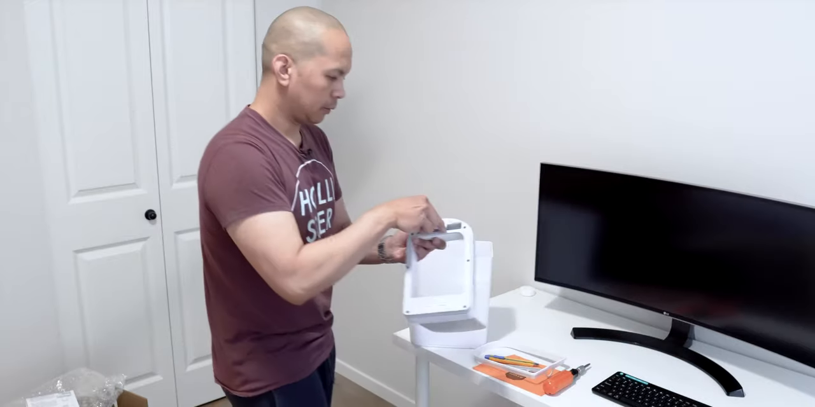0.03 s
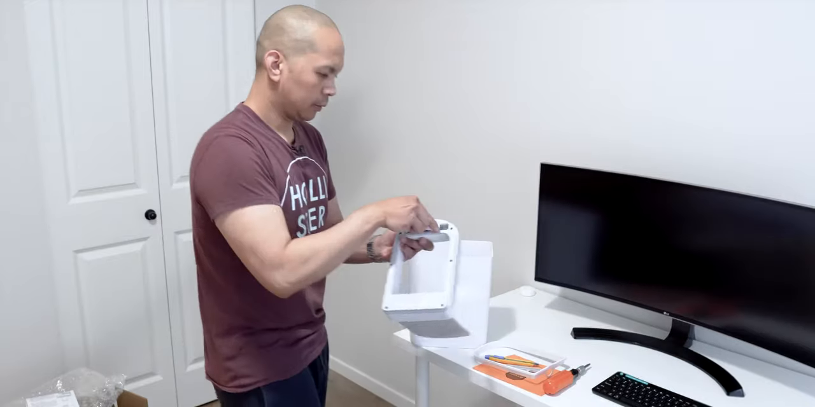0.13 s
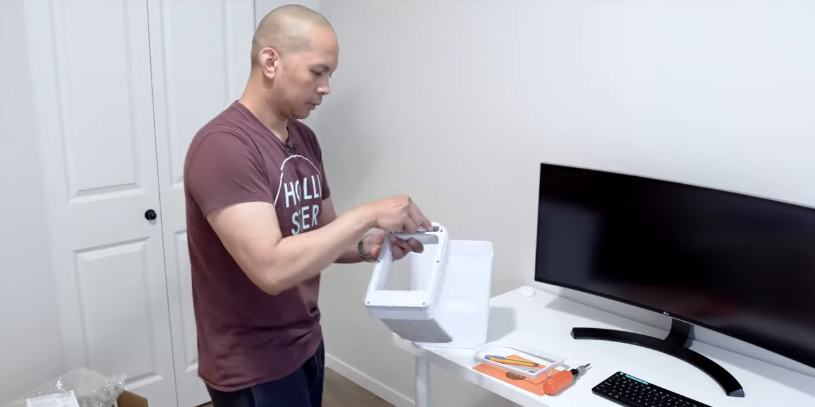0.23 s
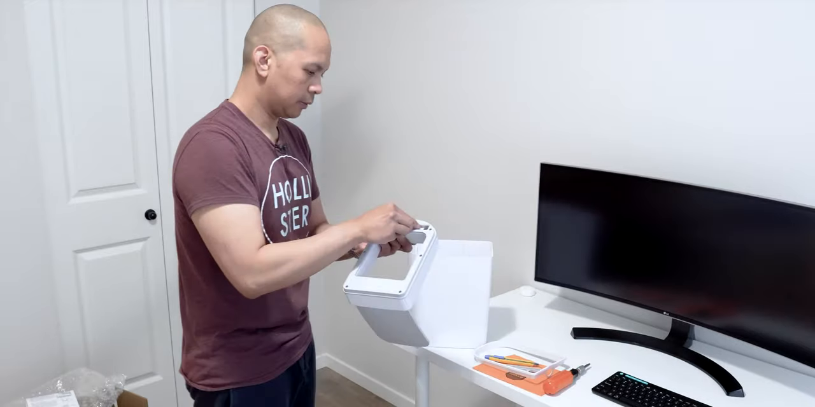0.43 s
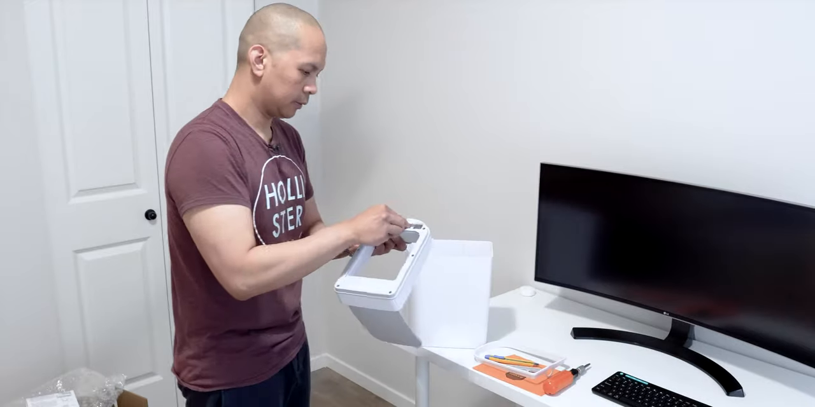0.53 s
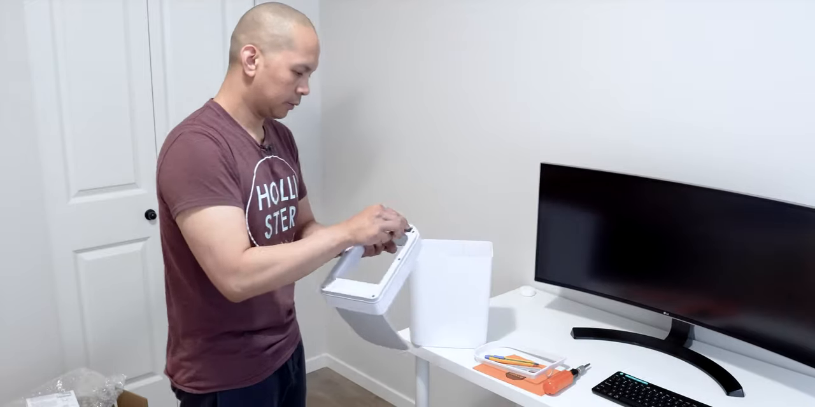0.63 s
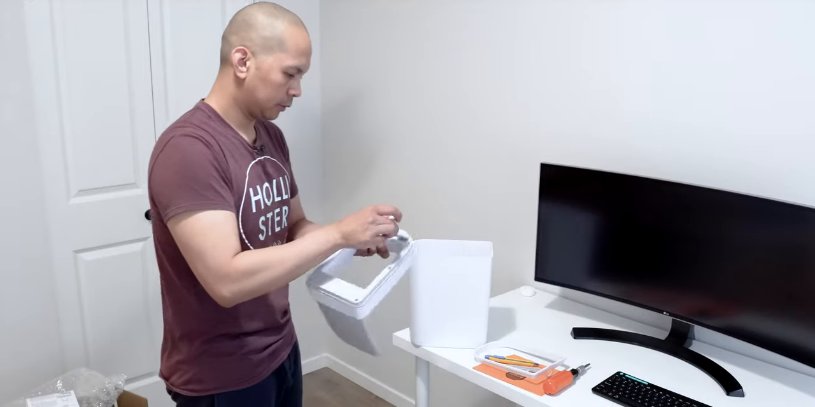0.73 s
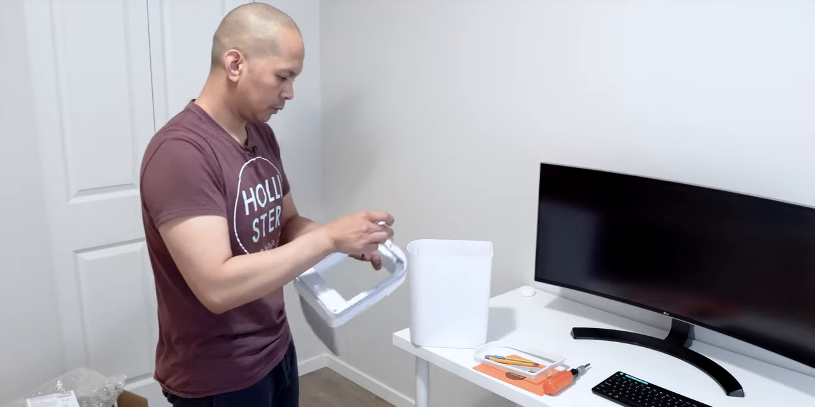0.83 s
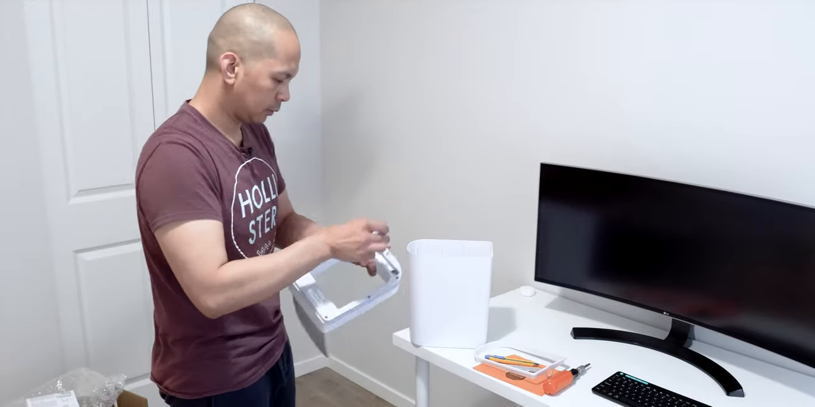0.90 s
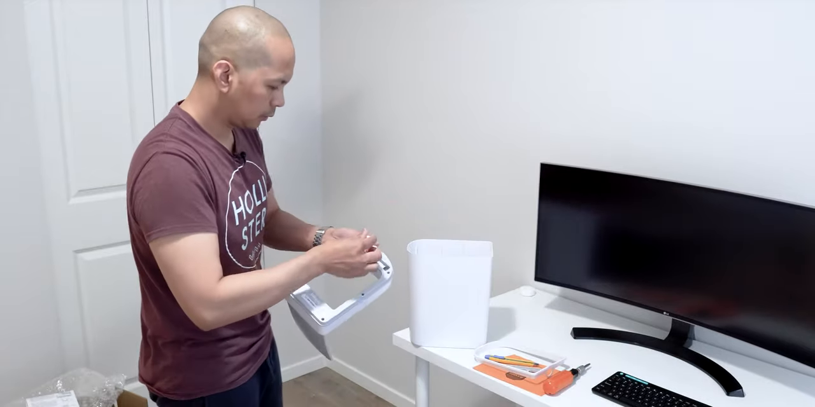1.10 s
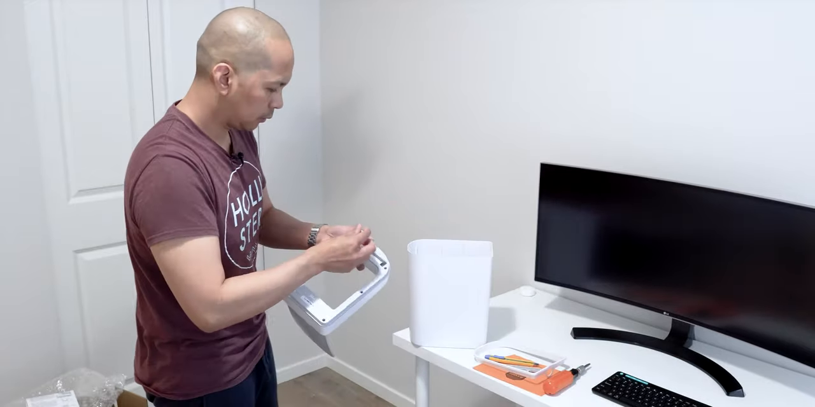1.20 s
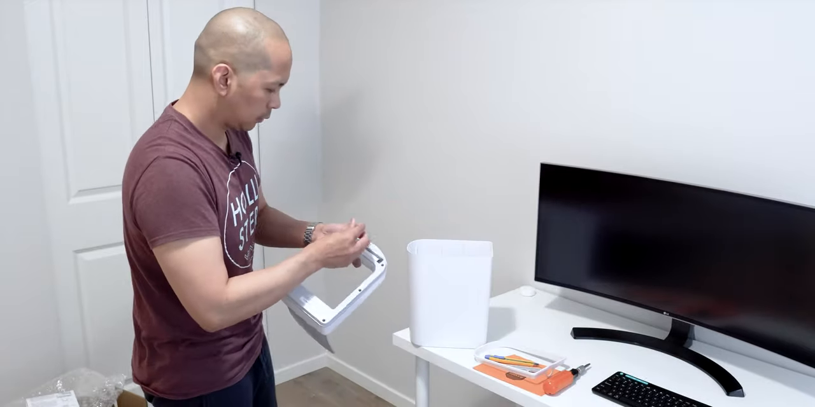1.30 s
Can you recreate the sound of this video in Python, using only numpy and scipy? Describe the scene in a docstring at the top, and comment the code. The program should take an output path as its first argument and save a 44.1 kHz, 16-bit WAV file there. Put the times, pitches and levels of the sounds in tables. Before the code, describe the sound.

A hollow plastic lid is handled, scraping and knocking in a short clatter. Then batteries click lightly against their metal contacts. The microphone is fairly near, in a bare, echoing room with a low motor hum.

```python
"""Plastic lid and batteries, indoors

A bare, echoing room on one microphone, near enough for the direct sound to lead the echo.
Hands work a hollow plastic lid: blows ring its shell, tiny slips make it creak and scrape, and
fingers hiss over it. Batteries click on their metal contacts. A low motor hum lies underneath."""
import sys
import numpy as np
from scipy import signal
from scipy.io import wavfile
from scipy.ndimage import uniform_filter1d

SR = 44100
rng = np.random.default_rng(int(sys.argv[2]) if len(sys.argv) > 2 else 0)


def generate_wav(sig):
    """Save sig (samples, or channels by samples) to the path in sys.argv[1] as 16-bit PCM at SR."""
    pcm = np.round(np.clip(np.atleast_2d(sig).T, -1, 1) * 32767).astype(np.int16)
    wavfile.write(sys.argv[1], SR, pcm)


N = 59535

# motor hum: (time [s], pitch [Hz], level [dB])
MOTOR_HUM = [(0.0, 62, -40.5), (0.082, 54, -35), (0.108, 60.3, -41), (0.308, 59, -36.5), (0.5, 60, -35),
             (0.522, 59.3, -45), (0.698, 59.07, -38.5), (0.97, 58.7, -34.5), (1.0, 58.8, -38),
             (1.248, 57.1, -36), (1.274, 56.9, -41), (1.35, 58.9, -38.5)]
# handling rumble: (time [s], level [dB])
HANDLING_RUMBLE = [(0.0, -64.5), (0.074, -47), (0.112, -58), (0.432, -68), (0.484, -65), (0.514, -44.5),
                   (0.566, -53.5), (0.642, -71), (0.842, -83), (0.886, -59), (0.91, -67.5), (1.258, -70.5),
                   (1.33, -59.5), (1.35, -50.5)]
# decay of the bare room: (octave centre [Hz], T60 [s])
ROOM_DECAY = [(250, 0.19), (500, 0.23), (1000, 0.51), (2000, 1), (4000, 0.83), (8000, 0.49), (14000, 0.1)]
# skin sliding on smooth plastic: (time [s], level [dB] in each of the three slide bands)
FINGER_SLIDE = [(0.0, -59, -49, -69), (0.04, -47.5, -43, -46), (0.124, -41.5, -43.5, -50),
                (0.172, -55, -50.5, -57), (0.18, -38, -62, -56), (0.194, -51, -62, -67),
                (0.266, -59.5, -70, -73), (0.424, -67, -56, -66), (0.492, -53.5, -54.5, -56),
                (0.522, -38, -39, -48), (0.526, -52, -51, -55), (0.566, -39.5, -40.5, -54),
                (0.664, -46.5, -46.5, -69), (0.752, -59, -57, -68), (0.826, -76, -88, -107),
                (0.868, -83, -97, -102), (0.928, -80, -84, -84), (0.97, -41.5, -55, -42),
                (1.056, -47.5, -59, -57), (1.078, -48.5, -67, -50), (1.154, -57.5, -74, -71),
                (1.164, -55, -61, -55), (1.214, -59, -68, -69), (1.35, -62, -70, -71)]
# modes of battery and contact: (frequency [Hz], gain [dB], T60 [s])
CONTACT_MODES = [(3350, 1, 0.0091), (3905, 10, 0.068), (4090, 7, 0.046), (4730, 3, 0.012),
                 (6740, -4.5, 0.0093), (7670, 2, 0.018), (8220, -7.5, .015), (12000, -8, 0.0097),
                 (13200, 8.5, 0.0099), (14700, 2, .02)]
# battery clicks: (time [s], strength [dB] in each of four regions of modes, low to high)
BATTERY_CLICKS = [(.4118, -58, -70, -70, -50), (.4630, -55, -65, -49, -50), (0.963, -40, -48, -36, -41),
                  (0.9697, -40, -56, -31.5, -40), (.9790, -53, -54, -59, -45), (.9860, -50, -52, -32, -41),
                  (1.0730, -35, -41, -28.5, -54), (1.163, -34, -42, -36, -48),
                  (1.2320, -37.5, -52, -48, -58.5), (1.283, -47, -50.5, -58, -63)]
# modes of the lid's shell: (frequency [Hz], gain [dB], T60 [s])
SHELL_MODES = [(342, -16, 0.12), (479.5, 1.5, 0.042), (629.6, 1.5, 0.023), (831, 1.5, 0.051),
               (1004, 4.5, 0.014), (1265, -0.5, 0.042), (1575, 5.5, 0.01), (2210, 1, 0.0095),
               (2472, 3, 0.014), (2854, 8, 0.008), (3487, 7, 0.0068), (4216, 7, 0.005), (5160, 4, 0.0038),
               (6030, 4, 0.0062), (7340, 0, 0.0073), (10500, 3, 0.0028), (13000, -4, 0.0037)]
# scraping: (time [s], level [dB] in each of the six shell regions)
SHELL_SCRAPE = [(0, -63, -56, -60.5, -74, -66, -51), (0.05, -62, -70, -62, -68, -61, -46.5),
                (0.108, -57, -62.5, -59, -64.5, -58.5, -55), (0.124, -51.5, -37, -63, -64, -54, -56),
                (0.172, -45, -58, -47.5, -68, -67, -54), (0.19, -26.5, -47, -33, -40, -42, -58),
                (0.24, -41.5, -40, -38, -63, -51, -60), (0.3, -53.5, -46.5, -43, -43, -61, -79),
                (0.33, -52, -48, -45, -51, -52, -59), (0.38, -50, -56, -50, -52, -76, -70),
                (0.44, -48, -65, -38, -58, -75, -84), (0.465, -40, -46, -55, -54, -56, -72),
                (0.49, -46, -56, -48, -38, -48, -62), (0.512, -29, -46, -37, -49, -51, -71),
                (0.524, -43, -19, -38, -51, -41, -57), (0.55, -31.5, -38.5, -23, -40, -49, -66),
                (0.62, -43.5, -34.5, -35, -40.5, -46, -44.5), (0.72, -44.5, -37.5, -36.5, -40.5, -45, -48),
                (0.82, -73.5, -41.5, -40.5, -54.5, -51.5, -61.5), (0.93, -89, -58, -43, -57, -62, -71),
                (0.96, -68, -54, -49, -55.5, -44, -52), (0.985, -59, -53, -49, -48.5, -53, -50),
                (1.03, -56.5, -53.5, -39.5, -53, -53.5, -61), (1.11, -53.5, -64, -47, -58.5, -57, -61),
                (1.2, -81, -84, -61, -63.5, -60.5, -87), (1.27, -90, -79, -65, -69, -66.5, -93),
                (1.35, -80.5, -69, -75.5, -78.5, -73, -80)]
# knocks: (time [s], strength [dB] in each of the six shell regions)
SHELL_KNOCKS = [(0.116, -41, -24, -32, -20, -67, -37), (0.179, -52, -45, -35, -33, -26, -36.5),
                (0.1808, -20.5, -28, -20, -20, -22.5, -28), (0.347, -29, -37.5, -28.5, -23.5, -29, -45),
                (0.4138, -29, -52, -30, -26, -43, -66), (0.4529, -19.5, -54, -32, -26.5, -38, -62),
                (0.5014, -16.5, -37.5, -33, -24, -26, -32), (0.5139, -42, -41, -49, -31, -22, -46),
                (0.5194, -25, -18.5, -14.5, -16.5, -12, -24), (0.534, -57, -9, -19.5, -39, -49, -38),
                (0.5394, -43, -19.5, -22, -25, -46, -25), (0.5606, -24.5, -22, -15.5, -21, -14, -21.5),
                (0.5746, -24, -21, -27, -15.5, -46, -40.5), (0.5803, -42, -31, -21.5, -28, -13.5, -30.5),
                (0.5958, -40, -32, -21.5, -39, -29, -29), (0.6095, -42, -22.5, -13, -38, -30.5, -40),
                (0.6602, -39, -18.5, -15.5, -19, -42, -74), (0.9698, -56, -32, -15, -44, -28, -36),
                (0.9954, -41, -26.5, -35.5, -55, -47, -48)]
# noise suppressor: (frequency [Hz], threshold per bin [dB])
GATE_THRESHOLDS = [(280, -61), (450, -64.5), (800, -66), (1200, -58.5), (3000, -88), (6000, -89),
                   (8000, -75), (11000, -83), (15000, -88)]

SHELL_REGIONS_HZ = (420, 760, 1350, 2650, 4400, 7000)   # centres
CONTACT_SPLITS_HZ, SLIDE_EDGES_HZ = (3650, 5500, 10000), (7080, 9400, 12040, 16900)
SLIPS_PER_S, SLIP_UNEVEN_DB, HAND_T60_RATIO = 2500, 2, .55
KNOCK_ECHO_DB, CLICK_ECHO_DB, ROOM_DELAY_S = -2.5, -11, 0.0071
GATE_SLOPE, GATE_DEPTH_DB, GATE_ABOVE_HZ = 1.2, 30, 280
LOW_CUT_HZ, TOP_CUT_HZ = 322, 15900


def amp(db):
    """dB to gain."""
    return 10 ** (np.asarray(db) / 20)


def unit_rms(x):
    """Scale to rms 1."""
    return x / np.sqrt(np.mean(x ** 2) + 1e-20)


def curves(rows):
    """A table's columns after time, one value per sample."""
    times, *columns = np.transpose(rows)
    return np.array([np.interp(np.arange(N) / SR, times, column) for column in columns])


def band(x, low_hz, high_hz, order=2):
    """Band-pass."""
    return signal.sosfilt(signal.butter(order, [low_hz, high_hz], "band", fs=SR, output="sos"), x)


def region_weights(hz):
    """Share of each shell region in a mode at this frequency."""
    centres = np.log(SHELL_REGIONS_HZ)
    return np.array([np.interp(np.log(hz), centres, row) for row in np.eye(len(centres))])


def ring(force, hz, t60):
    """One mode: a unit impulse starts a decaying sine of height 1."""
    decay, step = amp(-60 / (t60 * SR)), 2 * np.pi * hz / SR
    return signal.lfilter([0, np.sin(step)], [1, -2 * decay * np.cos(step), decay ** 2], force + 1e-18)


def strike(times, levels_db, modes, spread_db):
    """Each blow drives each mode with its own strength and sign; levels_db is (blows, modes)."""
    draws = rng.standard_normal((len(times), 2, len(modes)))
    scatter_db, signs = spread_db * draws[:, 0], np.sign(draws[:, 1])
    sound = np.zeros(N)
    for k, (hz, db, t60) in enumerate(modes):
        force = np.full(N, 1e-18)
        force[(times * SR).astype(int)] = amp(levels_db[:, k] + db - scatter_db[:, k]) * signs[:, k]
        sound += ring(band(force, hz / 1.4, hz * 1.4, order=1), hz, t60)
    return sound


def motor_hum():
    """A motor in the background: one low tone wavering in pitch and level."""
    hz, db = curves(MOTOR_HUM)
    phase = 2 * np.pi * np.cumsum(hz) / SR
    return -np.sqrt(2) * amp(db) * np.cos(phase)


def rumble():
    """Faint handling rumble comes and goes over steady sub-bass noise."""
    noise = rng.standard_normal((2, N + SR))   # a spare second lets the filters settle
    handling = unit_rms(band(noise[0], 114, 324, order=3)[SR:])
    sub_bass = unit_rms(band(noise[1], 28, 46.5)[SR:])
    return amp(curves(HANDLING_RUMBLE)[0]) * handling + amp(-51) * sub_bass


def room_echo(x):
    """Diffuse echo off bare walls: a noise tail dying at its own rate in each octave."""
    t, tail = np.arange(N) / SR, np.zeros(N)
    for hz, t60 in ROOM_DECAY:
        octave = band(rng.standard_normal(N), hz / np.sqrt(2), min(hz * np.sqrt(2), .45 * SR))
        tail += octave * amp(-60 * t / t60) / np.sqrt(t60)
    tail *= np.clip(t / ROOM_DELAY_S - 1, 0, 1)   # fades in after the delay
    return signal.fftconvolve(x, tail / np.sqrt(np.sum(tail ** 2)))[:N]


def finger_slide():
    """Skin on smooth plastic: a fine hiss in three treble bands."""
    bands = zip(curves(FINGER_SLIDE), SLIDE_EDGES_HZ, SLIDE_EDGES_HZ[1:])
    return sum(amp(db) * unit_rms(band(rng.standard_normal(N), low_hz, high_hz, order=4))
               for db, low_hz, high_hz in bands)


def battery_clicks():
    """Metal meets metal and rings in small, bright modes."""
    clicks = np.array(BATTERY_CLICKS)
    mode_region = np.searchsorted(CONTACT_SPLITS_HZ, np.array(CONTACT_MODES)[:, 0])
    return strike(clicks[:, 0], clicks[:, 1 + mode_region], CONTACT_MODES, spread_db=2.5)


def lid_scrape():
    """Dense, uneven slips excite all but the top two modes of the hand-damped shell."""
    levels_db, sound = curves(SHELL_SCRAPE), np.zeros(N)
    for hz, db, t60 in SHELL_MODES[:-2]:
        slips = (rng.random(N) < SLIPS_PER_S / SR) * rng.choice([-1, 1], N)
        strength = amp(SLIP_UNEVEN_DB * np.minimum(rng.exponential(size=N), 4))
        force = band(slips * strength, hz / 1.38, hz * 1.354)
        ringing = unit_rms(ring(force, hz, t60 * HAND_T60_RATIO))
        sound += amp(db + region_weights(hz) @ levels_db) * ringing
    return sound


def lid_knocks():
    """Blows ring the hollow shell, each with its own balance of modes."""
    knocks = np.array(SHELL_KNOCKS)
    weights = np.transpose([region_weights(hz) for hz, _, _ in SHELL_MODES])
    return strike(knocks[:, 0], knocks[:, 1:] @ weights, SHELL_MODES, spread_db=1.0)


def scene():
    """At the microphone: the handwork and its echo, bass cut, over hum and rumble."""
    knocks, clicks = lid_knocks(), battery_clicks()
    echo = room_echo(amp(KNOCK_ECHO_DB) * knocks + amp(CLICK_ECHO_DB) * clicks)
    handwork = knocks + clicks + echo + lid_scrape() + finger_slide()
    low_cut = signal.butter(6, LOW_CUT_HZ, "high", fs=SR, output="sos")
    return (signal.sosfilt(low_cut, handwork) + motor_hum() + rumble())[None]


def suppress_noise(x):
    """Above the bass, turns down each part of the spectrum that sinks under its threshold."""
    frames = dict(fs=SR, nperseg=1024, noverlap=768)
    hz, _, spectrum = signal.stft(x, **frames)
    power = uniform_filter1d(np.abs(spectrum) ** 2, size=9, axis=0)   # smooth over frequency
    power = uniform_filter1d(power, size=5, axis=1)   # and over time
    threshold_db = np.interp(hz, *np.transpose(GATE_THRESHOLDS))
    under_db = threshold_db[:, None] - 10 * np.log10(power + 1e-20)
    cut_db = np.clip(GATE_SLOPE * under_db, 0, GATE_DEPTH_DB) * (hz > GATE_ABOVE_HZ)[:, None]
    return signal.istft(spectrum * amp(-cut_db), **frames)[1][:N]


def record(dry):
    """The microphone feeds a noise suppressor, then a steep top cut."""
    top_cut = signal.ellip(12, .5, 90, TOP_CUT_HZ, fs=SR, output="sos")
    return signal.sosfilt(top_cut, suppress_noise(dry[0]))[None]


dry = scene()
out = record(dry)
generate_wav(out)
```